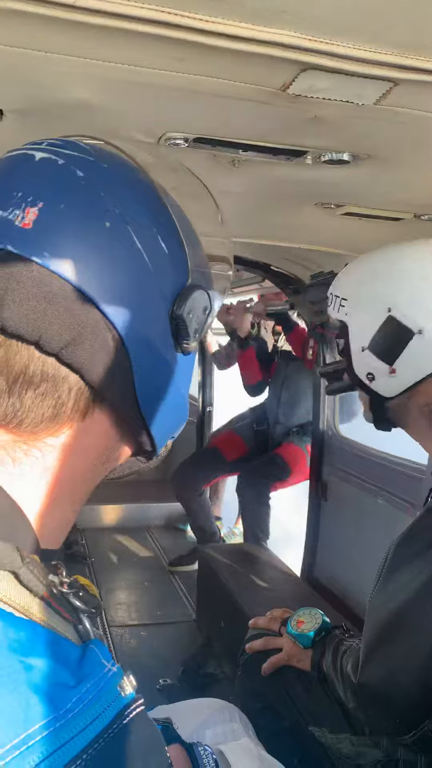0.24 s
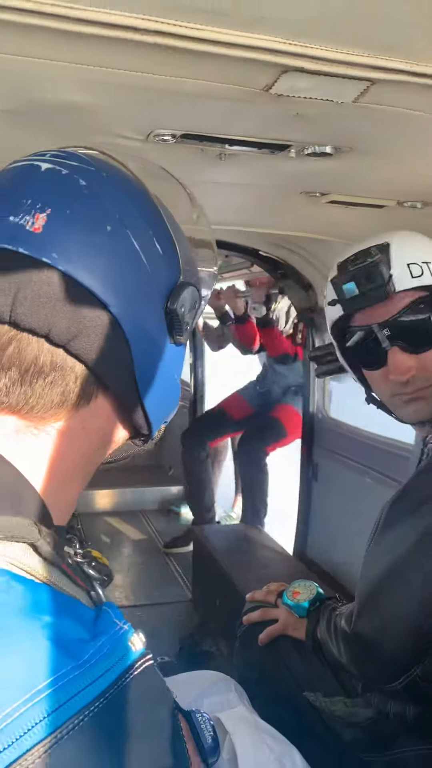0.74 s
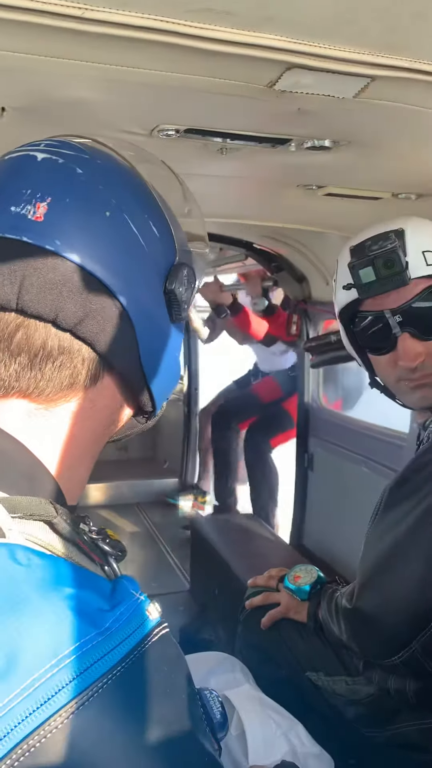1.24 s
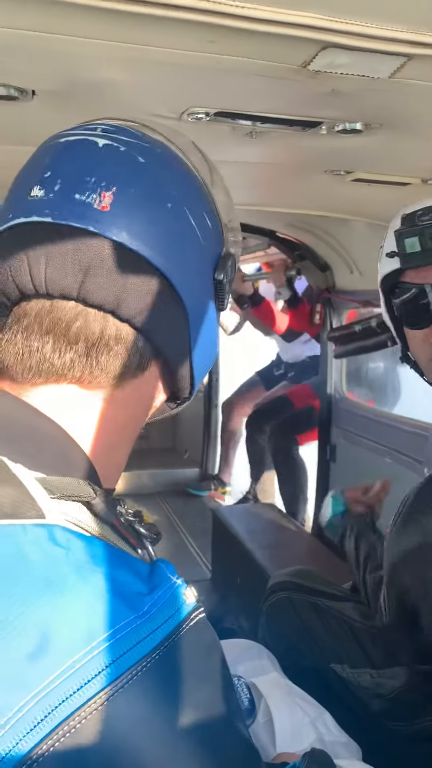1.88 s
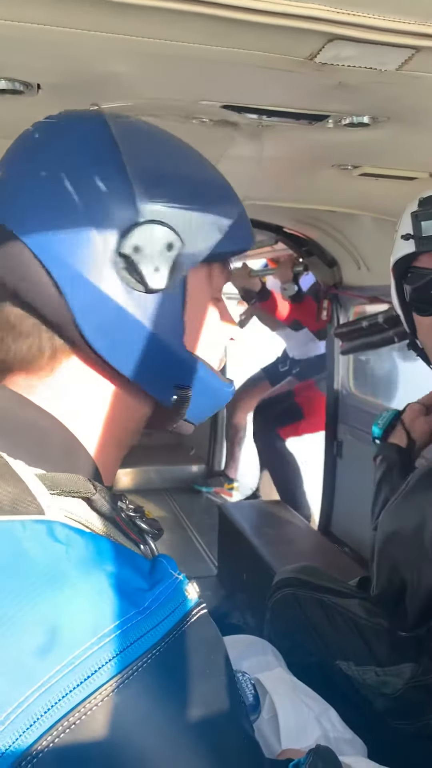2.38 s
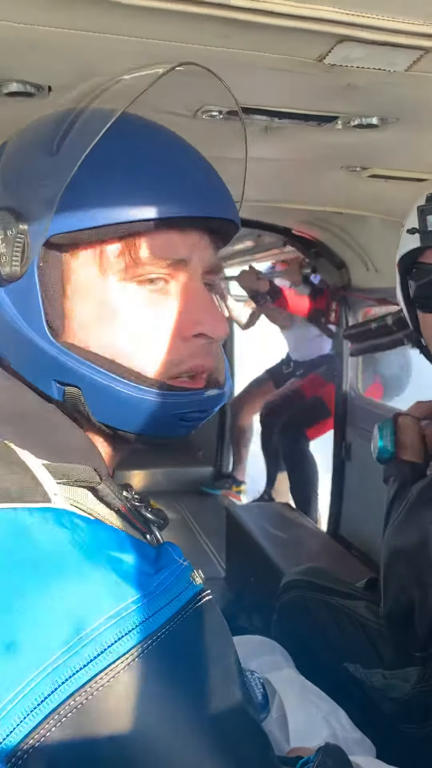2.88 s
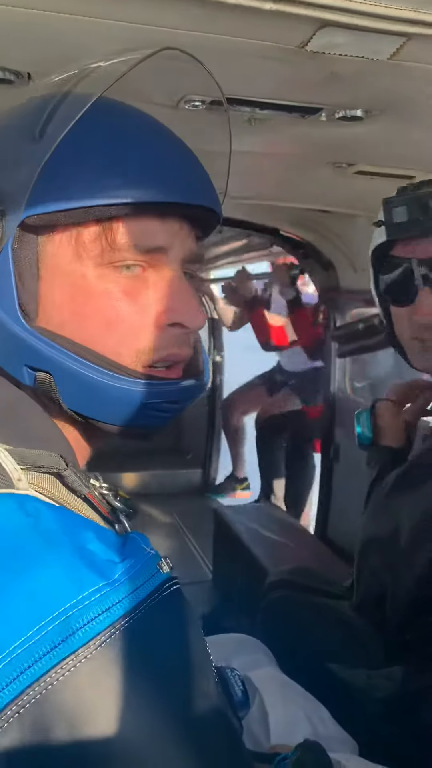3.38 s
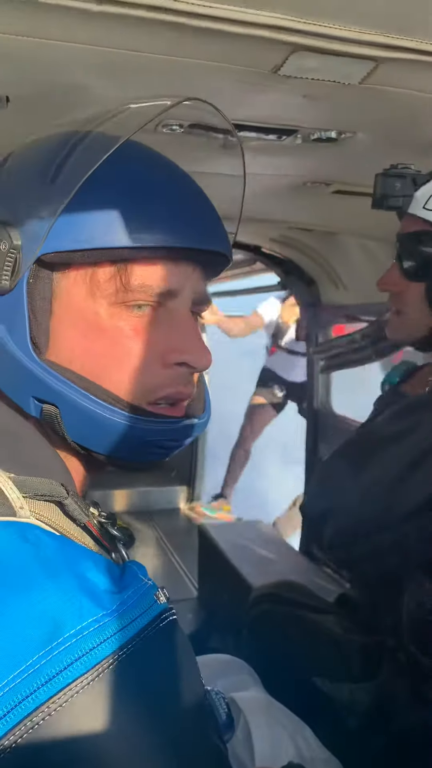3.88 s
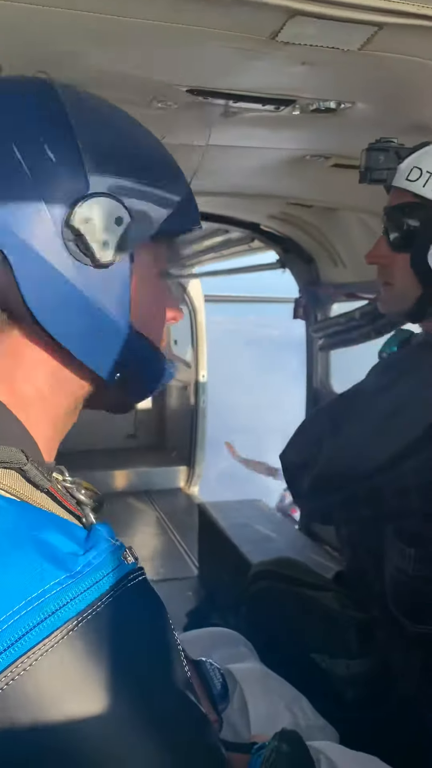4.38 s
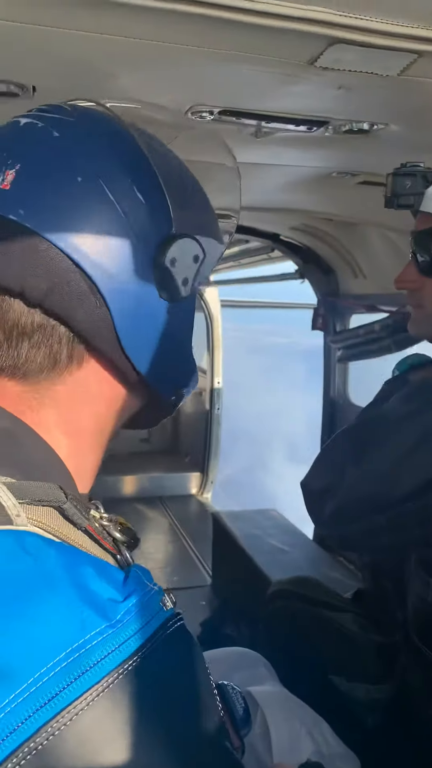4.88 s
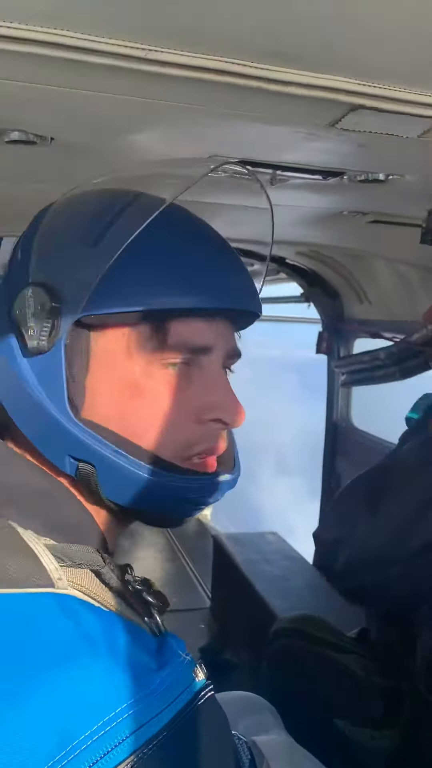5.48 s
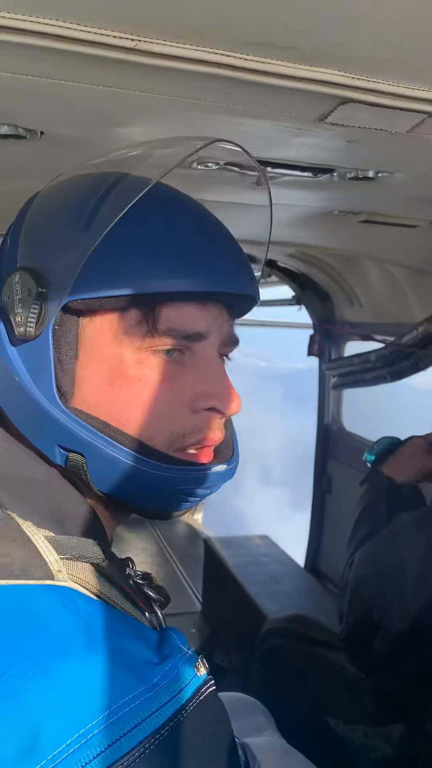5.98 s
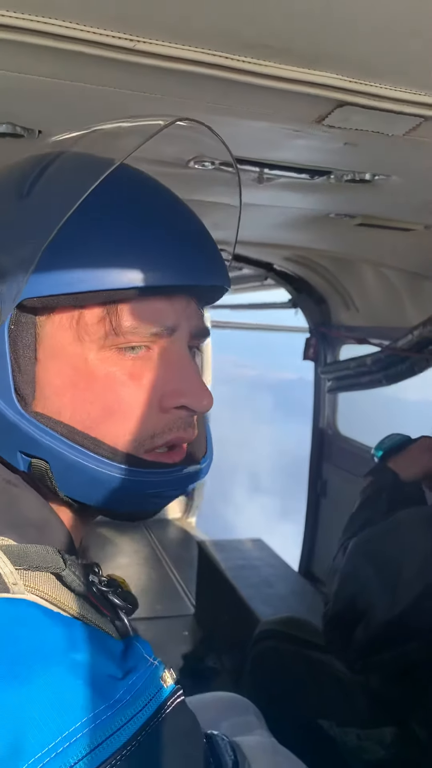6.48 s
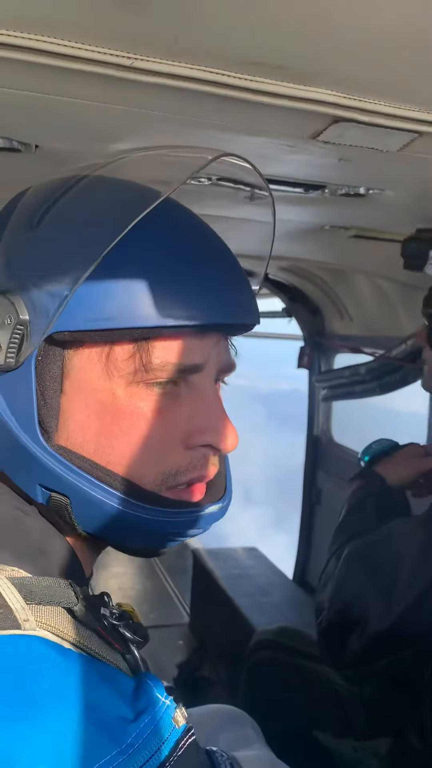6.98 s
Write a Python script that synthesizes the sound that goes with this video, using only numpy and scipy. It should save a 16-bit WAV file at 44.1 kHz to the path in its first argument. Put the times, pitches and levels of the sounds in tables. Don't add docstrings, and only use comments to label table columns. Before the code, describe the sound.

Wind roars through the open door of a flying propeller plane, deep bass buffeting building, with a low engine drone and faint steady gear whine beneath.

```python
import sys
import numpy as np
from scipy import signal
from scipy.io import wavfile
from scipy.ndimage import uniform_filter1d, minimum_filter1d

SR = 44100
rng = np.random.default_rng(int(sys.argv[2]) if len(sys.argv) > 2 else 0)


def makeup_ratio(level_db):
    decades = np.asarray(level_db, float) / 20
    return 10 ** decades


def dump(signal):
    limited = np.clip(np.atleast_2d(signal).T, -1, 1)
    pcm = np.round(limited * 32767).astype(np.int16)
    wavfile.write(sys.argv[1], SR, pcm)


N = 319725
FRAME = 2048
HZ = np.maximum(np.fft.rfftfreq(FRAME, 1 / SR), 1)[:, None]


def spectra(x):
    _, s, z = signal.stft(x, SR, nperseg=FRAME, noverlap=FRAME * 7 // 8)
    return s, z


def sound(z):
    return signal.istft(z, SR, nperseg=FRAME, noverlap=FRAME * 7 // 8)[1][:N]


def walk(rate, s, count=1):
    levels = rng.standard_normal((count, 400))
    return np.array([np.interp(s * rate, np.arange(len(w)), w) for w in levels])


def curves(table, s):
    return [np.interp(s, np.array(table)[:, 0], column) for column in np.transpose(table)[1:]]


def peak(hz, width_hz):
    return 1 / np.sqrt(1 + (2 * (HZ - hz) / width_hz) ** 2)


def unit_power(gain):
    return gain / np.sqrt(np.mean(gain ** 2))


def colour(points):
    hz, db = np.transpose(points)
    gain = makeup_ratio(np.interp(np.log(HZ), np.log(hz), db))
    return unit_power(gain * np.minimum(HZ / hz[0], 1) ** 4)


def tone(hz, db, wander_db, rate, lead=0):
    t = np.arange(N) / SR
    drift = walk(rate, t, count=2)
    turn = 2 * np.pi * hz * t + 0.15 * wander_db * drift[1]
    level = np.sqrt(2) * makeup_ratio(db + wander_db * drift[0])
    return level * np.sin([turn + lead / 2, turn - lead / 2])


def gear_whine():
    # t/s, departure from opposite phase/rad
    bearing = [(0, -0.15), (1.4, 0.053), (3.1, 0.079), (4.8, 0.018), (5.3, 0.33), (6.0, 0.18), (6.4, 0.51),
               (6.65, .08), (7.25, 0.5)]
    t = np.arange(N) / SR
    jitter_rad = 0.075 * walk(12, t)[0]
    lead = np.pi + curves(bearing, t)[0] + jitter_rad
    return tone(hz=664.5, db=-26.5, wander_db=1.7, rate=14, lead=lead)


def propeller_drone():
    return tone(hz=83, db=-18, wander_db=4, rate=12)[0]


def cabin_throb(s, buffet_db):
    t = np.arange(N) / SR
    return tone(hz=39, db=-3, wander_db=2.5, rate=5)[0] * makeup_ratio(np.interp(t, s, buffet_db))


def flow(s):
    # t/s, level over its early level/dB
    draught_table = [(0, -1), (.4, 0), (.8, -2), (1.2, .5), (2.0, 0.05), (2.8, 0), (3.2, 0.3), (3.5, 1.1),
                     (3.75, 3), (4.0, 0), (4.3, -2), (4.6, -3.5), (7.25, -3)]
    # t/s, length/s, buffet lift/dB, roar lift/dB
    surges = [
        (.85, 0.17, -11, -.5),
        (1.297, 0.15, 2.5, -13),
        (2.3, 0.23, 1.5, 0),
        (3.35, .12, 2, 1.5),
        (4.1, .15, 4, .5),
        (4.35, 0.2, 0, -4),
        (5.1, 0.27, -2.5, 2),
        (5.9, 0.5, 4, -1.5),
        (6.5, .3, 5, -2.5),
        (7.15, .25, -3.5, 0.5),
    ]
    draught = curves(draught_table, s)[0]
    at, length, buffet_lift, roar_lift = np.transpose(surges)
    bell = np.exp(-((s[:, None] - at) / length) ** 2)
    wander = walk(5, s, count=2)
    buffet_build = -9 * np.exp(-s / 0.95)
    roar_build = -2.4 * np.exp(-s / 0.38)
    buffet_db = -20.5 + buffet_build + bell @ buffet_lift + 1.1 * wander[0]
    roar_db = -10.5 + 1.45 * draught + roar_build + bell @ roar_lift + 0.44 * wander[1]
    cabin_db = -22.5 + 0.76 * draught
    rush_db = -28 + 1.14 * draught
    return buffet_db, roar_db, cabin_db, rush_db


def patches(s, slow, quick):
    band = np.clip(3 * np.log2(HZ[:, 0] / 20), 0, 31).astype(int)
    shared = uniform_filter1d(walk(6.5, s, count=32), size=3, axis=0)
    eddies = slow * shared + quick * walk(13, s, count=32)
    return eddies[band] / np.sqrt(1 + HZ / 3000)


def streaks(s):
    band = np.clip(12 * np.log2(HZ[:, 0] / 300), 0, 63).astype(int)
    return walk(11, s, count=64)[band] * peak(1350, 2200) * (HZ > 300)


def buffet(buffet_db):
    # f/Hz, width/Hz, level/dB
    pumping = [(39.2, 5, 0), (42.8, 15, -13)]
    gain = sum(makeup_ratio(db) * peak(hz, width) ** 2 for hz, width, db in pumping)
    return unit_power(gain) * makeup_ratio(buffet_db + 1.0)


def door_roar(roar_db):
    # f/Hz, level per Hz/dB
    roar = [(50, -10), (62, 2), (72, -4.5), (105, 2), (125, -3), (150, -8.5), (175, -15.5), (230, -27)]
    return colour(roar) * (HZ < 260) * makeup_ratio(roar_db + 2.0)


def air_rush(cabin_db, rush_db):
    # f/Hz, level per Hz/dB
    air = [(200, 5), (300, 2.5), (395, 1), (480, -3.5), (800, -3.5), (1300, -9.5), (2000, -12.5),
           (3500, -18), (5000, -20.5), (8000, -23.5), (11500, -25), (13500, -30), (15000, -39),
           (15800, -75)]
    # f/Hz, width/Hz, lift/dB
    cabin = [(350, 60, -3), (393, 18, 6), (930, 150, -2), (1114, 18, 5), (1302, 18, 7), (1389, 16, 4),
             (1615, 18, 4), (11300, 190, 2.5), (13950, 60, 9)]
    lift_db = sum(db * peak(hz, width) ** 2 for hz, width, db in cabin)
    high = np.clip(np.log(HZ / 500) / np.log(2.4), 0, 1)
    level_db = (1 - high) * (cabin_db + 2.5) + high * (rush_db + 8.0)
    return colour(air) * makeup_ratio(lift_db) * makeup_ratio(level_db)


def wind(s, levels):
    buffet_db, roar_db, cabin_db, rush_db = levels
    power = buffet(buffet_db) ** 2 + door_roar(roar_db) ** 2 + air_rush(cabin_db, rush_db) ** 2
    return np.sqrt(power) * makeup_ratio(patches(s, slow=0.67, quick=1.5) + 0.96 * streaks(s))


def port_gust(s):
    start, attack, hold, release = 6.24, 0.046, 0.2, 0.1
    corners = start + np.cumsum([0, attack, hold, release])
    return 0.035 + np.interp(s, corners, [0, 0.46, 0.46, 0])


def opposed(s):
    # t/s, length/s, f/Hz, width/Hz, share 0-1
    moments = [
        (.3, 1, 290, 260, 0.7),
        (4.55, 0.25, 700, 260, 1),
    ]
    share = 0
    for at, length, hz, width, most in moments:
        share = share + most * np.exp(-((s - at) / length) ** 2) * peak(hz, width) ** 4
    return np.clip(share, 0, 1)


def ports(s, near, stray):
    # f/Hz, left lead/rad, likeness 0-1
    pair = [(228, 3.12, 1), (300, 2.76, 0.88), (456, 2.96, 0.95), (603, 2.75, 1), (910, 2.61, 1),
            (1350, 1.95, 0.57), (1570, 1.72, 0.87), (1910, 1.8, 0.6), (2215, 2.59, 0.88),
            (3100, 2.67, 0.75), (3950, 1.42, 0.76), (5050, 3.47, 0.74), (6360, 5.72, 0.96),
            (12220, 11.9, 0.36), (14000, 16, .45), (16000, 16.5, .6)]
    # t/s, mono below f/Hz, full stereo above f/Hz
    guard = [(0, 8.1, 110), (.86, 38, 138), (.9, 69, 198), (2.1, 83, 223), (2.25, 115, 227),
             (2.6, 231, 238), (2.8, 190, 248), (3.0, 218, 345), (4.0, 214, 416), (5.6, 232, 406),
             (6.22, 220, 350), (6.5, 150, 256), (7.25, 68, 219)]
    mono_hz, open_hz = curves(guard, s)
    opened = np.clip((HZ - mono_hz) / (open_hz - mono_hz), 0, 1)
    free = 1 - opposed(s)
    hz, lead, like = np.transpose(pair)

    lead = np.interp(HZ, hz, lead) + patches(s, slow=0.091, quick=0.2) + 0.54 * streaks(s)
    long_way = (s < 2.82) | (s > 6.35)
    phase = opened ** 0.84 * (np.pi + free * (lead - np.pi) - 2 * np.pi * long_way)

    gusty = np.clip(port_gust(s), 0, 1) * peak(370, 1300)
    like = np.clip(np.interp(HZ, hz, like), 0, 1) * (1 - gusty)
    like = 1 - opened * free * (1 - like)
    left = near * np.exp(1j * phase) * like + stray * np.sqrt(1 - like ** 2)
    shade_db = np.interp(s, [0.39, 2.6], [-3, 0])
    return left * makeup_ratio(shade_db * (HZ < 115)), near


def scene():
    s, near = spectra(rng.standard_normal(N))
    levels = flow(s)
    gain = wind(s, levels)
    low_tones = cabin_throb(s, levels[0]) + propeller_drone()
    near = near * gain + spectra(low_tones)[1]
    stray = spectra(rng.standard_normal(N))[1] * gain
    return np.array([sound(z) for z in ports(s, near, stray)]) + gear_whine()


def limiter(x):
    ceiling = 0.85
    bass = signal.sosfiltfilt(signal.butter(2, 300, fs=SR, output="sos"), x)
    allowed = (ceiling / np.maximum(np.abs(x).max(axis=0), ceiling)) ** 1.6
    smooth = uniform_filter1d(minimum_filter1d(allowed, size=901), size=801)
    return x - bass * (1 - smooth)


def band_limit(x):
    return signal.sosfilt(signal.butter(12, 15720, fs=SR, output="sos"), x)


def record(dry):
    mix = limiter(dry)
    return band_limit(mix)


dry = scene()
out = record(dry)
dump(out)
```